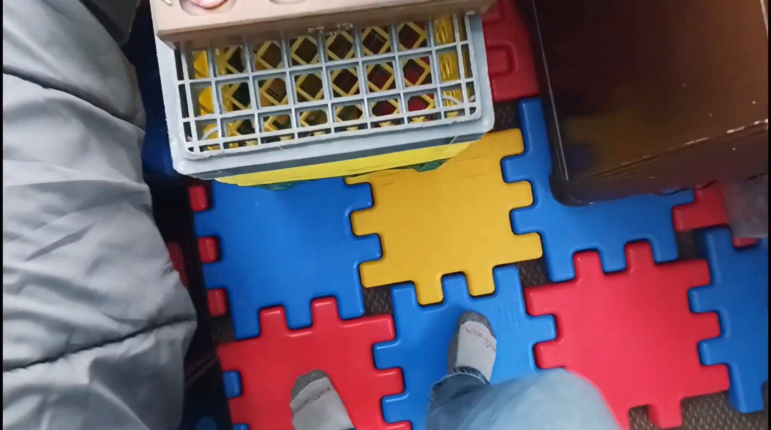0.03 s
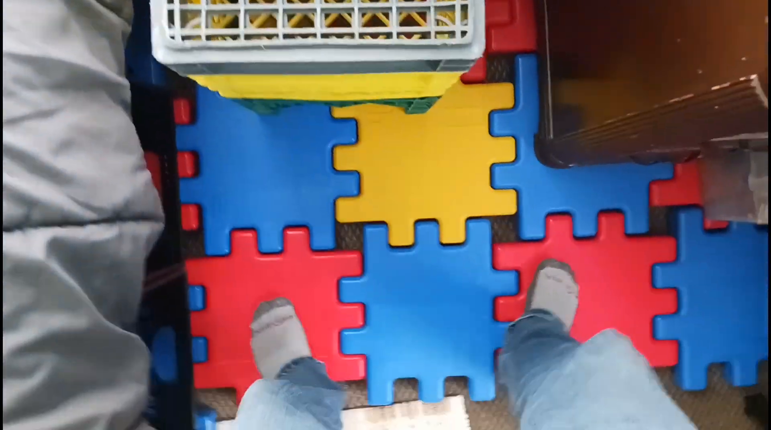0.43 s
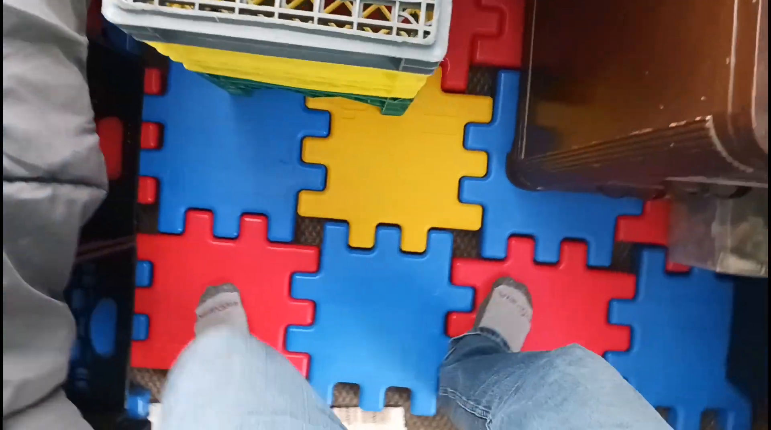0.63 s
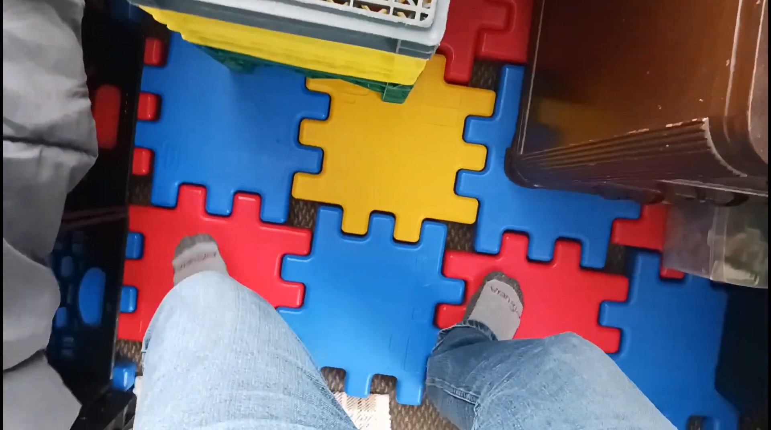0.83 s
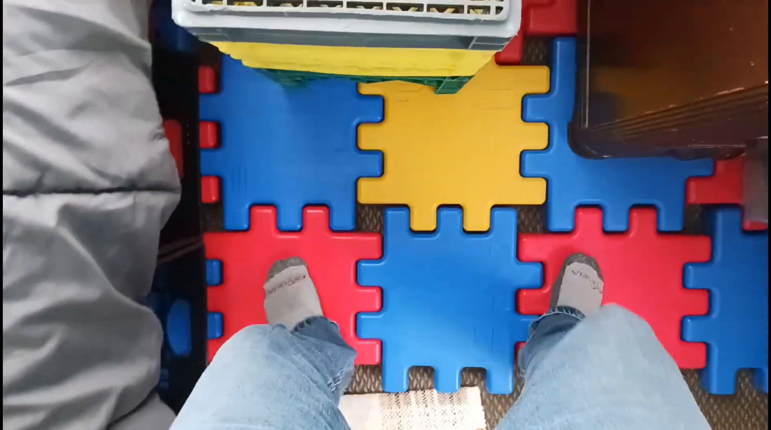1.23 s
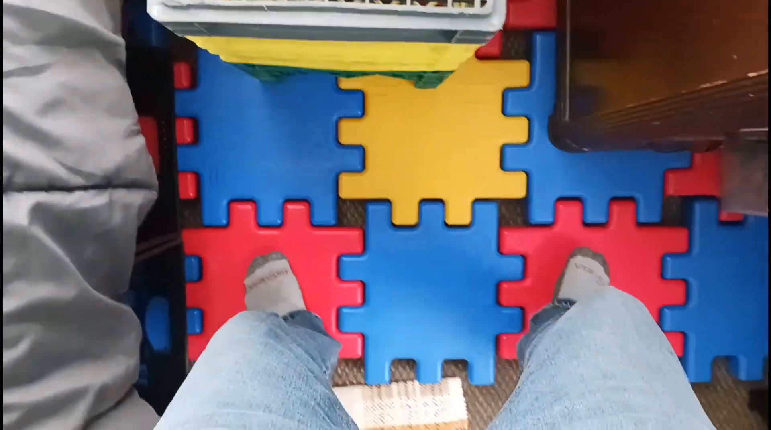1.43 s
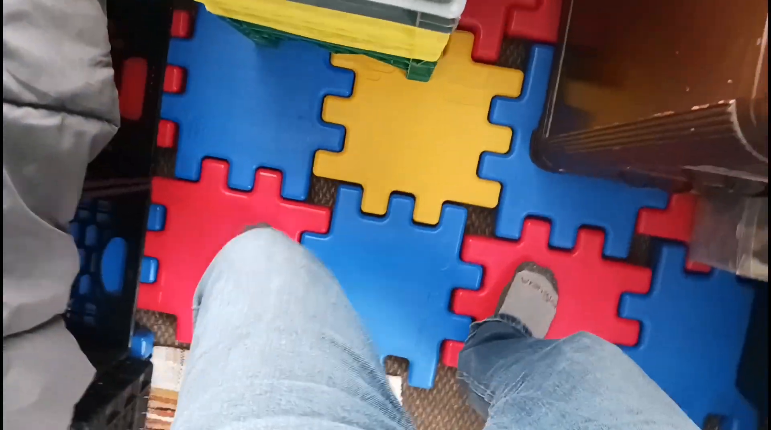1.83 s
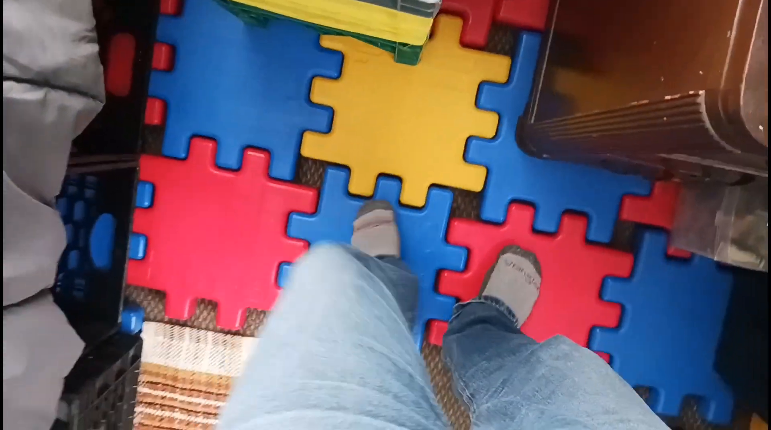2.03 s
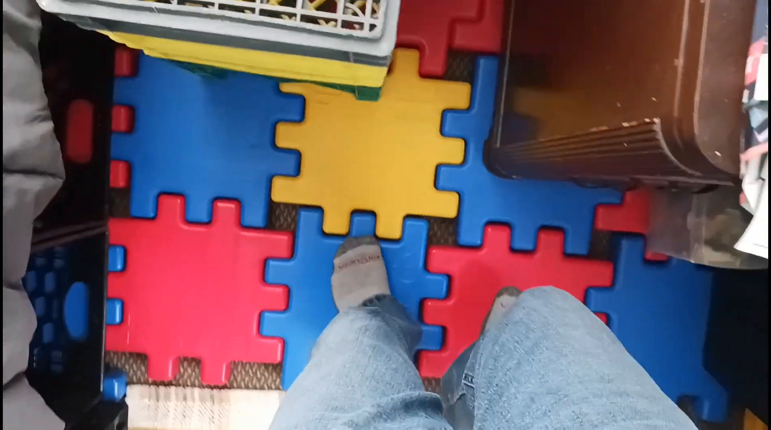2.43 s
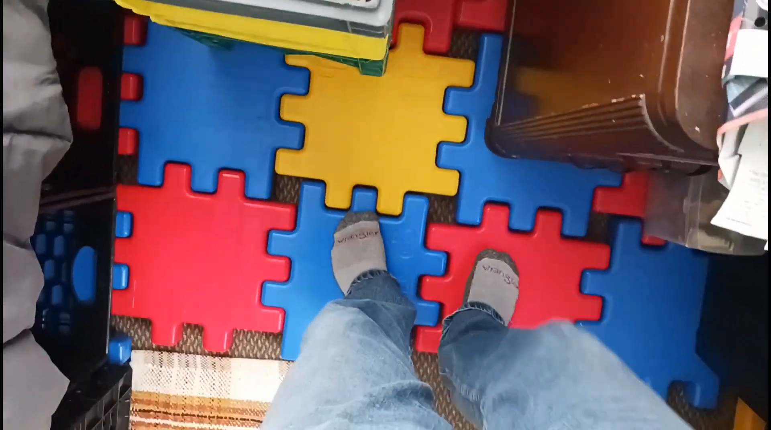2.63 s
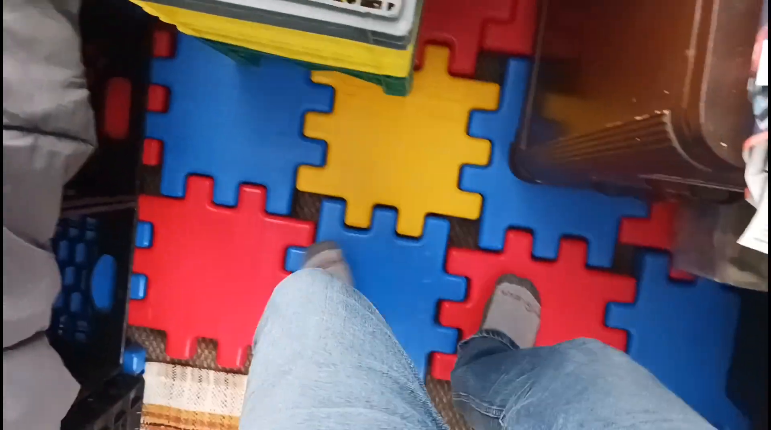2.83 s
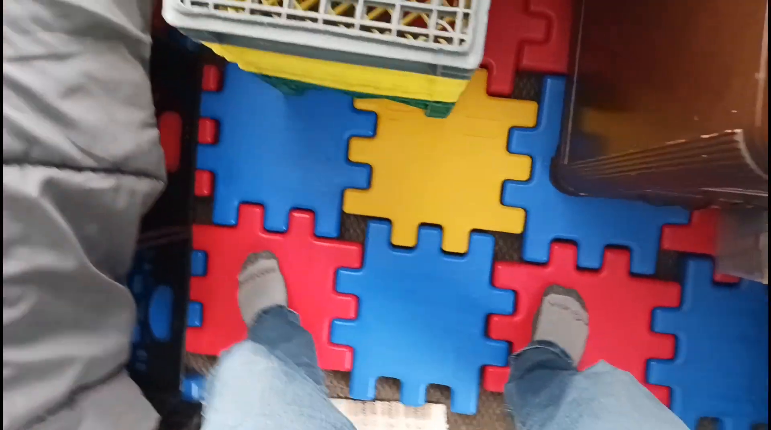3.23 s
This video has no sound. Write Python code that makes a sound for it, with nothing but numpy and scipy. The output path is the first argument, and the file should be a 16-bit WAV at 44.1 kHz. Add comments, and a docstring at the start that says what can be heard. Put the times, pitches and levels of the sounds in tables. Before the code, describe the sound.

Jeans swish and rub as someone in socks shuffles over foam floor tiles, heard from chest height in a small, quiet room. A soft step at 0.5 seconds leads into a big swish at 0.8, then the firmest landing thuds at 1.1. More dull steps come around 1.6, 2.1 and 2.7 seconds, alternating with big swishes near 1.9 and 2.9. A light step ends it at about 3.3.

```python
"""Someone in socks and jeans shuffles sideways over foam floor tiles in a small, quiet room.
A foot touches down with a soft knock, then the legs move: each swish is countless cloth fibres slipping.
The first big swish crests at 0.8 s; at 1.1 s comes the firmest landing, and the floor thuds under the
weight. More footfalls alternate with big swishes near 1.9 s and 2.9 s, and a light step ends the move.
All of it is heard from chest height."""
import sys
import numpy as np
from scipy import signal
from scipy.fft import rfft, irfft
from scipy.io import wavfile
from scipy.ndimage import uniform_filter1d

SR = 44100
rng = np.random.default_rng(int(sys.argv[2]) if len(sys.argv) > 2 else 0)


def store_wav(level_fs):
    """Save 16-bit WAV to argv[1]."""
    pcm = np.round(np.clip(np.atleast_2d(level_fs), -1, 1) * 32767)
    wavfile.write(sys.argv[1], SR, pcm.T.astype(np.int16))


N = 149940

# stereo image, 1 is mono: frequency_hz, correlation
STEREO_IMAGE = [(50, 0.61), (300, 0.74), (800, 0.88), (1200, 0.32), (1550, 0.57), (2100, -0.26),
                (2900, 0.34), (3400, -0.018), (4200, 0.3), (5200, -0.026)]
# room tone: frequency_hz, level_db
ROOM_TONE_EQ = [(20, -23), (45, 1), (90, -7.5), (160, -13), (600, -22), (1500, -31), (4500, -25),
                (15000, -21.5)]
# reverb decay: frequency_hz, t60_s
REVERB_DECAY = [(300, 0.22), (8000, 0.12)]
# weight sinking into the floor: start_s, peak_db, pitch_hz, swell_s
THUDS = [(0, -42, 45, 0.021), (0.492, -42, 155.5, 0.026), (0.549, -45.5, 82, 0.013),
         (1.095, -34, 95.3, 0.015), (1.099, -44, 52, 0.017), (1.495, -42.5, 63, 0.02),
         (1.563, -36.5, 67, .017), (1.615, -44.5, 48, .022), (2.15, -55, 53, 0.036),
         (2.191, -41.5, 98, 0.019), (2.69, -44, 43, 0.056), (2.705, -43, 187, 0.044),
         (3.272, -47.5, 93, 0.012)]
# feet landing: start_s, level_db, pitch_hz, settle_s, scuff_db
FOOTFALLS = [(.003, -55.5, 240, 0.059, -2), (0.493, -53, 167, 0.078, 5.5), (1.089, -38.5, 387, 0.027, -0.5),
             (1.624, -44.5, 308, 0.017, -7), (1.661, -54, 270, 0.023, -15), (2.141, -49, 184, 0.057, -0.5),
             (2.692, -41, 260, 0.042, -10.5), (2.993, -57.5, 246, 0.01, 2), (3.011, -67.5, 224, 0.011, 11),
             (3.263, -52, 162, 0.032, 3)]
# ring of the floor: pitch_hz, level_db, t60_s
FLOOR_MODES = [(148, 5, 0.3), (157, 9.5, 0.3), (184.9, 5.5, 0.317), (280, 1, 0.29), (311.6, -0.5, 0.23),
               (346.6, -11, 0.38), (384, -8, 0.21), (514, 3, 0.072), (801, 6.5, 0.047), (971, 13.5, 0.045)]
# sock on foam: frequency_hz, level_db
SCUFF_EQ = [(30, 1), (120, 6), (450, -2), (620, -9), (850, -4.5), (1200, -10), (2200, -14), (5000, -44),
            (15000, -55)]
# rubbing gathered in one band: peak_s, half_length_s, pitch_hz, width_hz, level_db
FRICTION_BANDS = [(0.262, 0.14, 2850, 690, -54), (0.77, 0.14, 13700, 2000, -36.5),
                  (1.202, 0.18, 3020, 403, -55.5), (1.224, 0.11, 1550, 410, -55.5),
                  (1.46, 0.16, 4360, 1020, -52), (1.832, 0.096, 82, 70, -53.5),
                  (1.865, 0.055, 13300, 2200, -40.5), (2.013, 0.12, 2350, 940, -47),
                  (2.802, 0.081, 970, 280, -53.5), (2.87, 0.13, 4760, 1000, -49.5),
                  (2.897, 0.071, 13200, 2780, -39), (3.041, 0.015, 5060, 1310, -39.5),
                  (3.135, 0.018, 910, 220, -54)]
# cloth tone at each ear: frequency_hz, level_db
CLOTH_EQ_LEFT = [(60, -16.5), (300, -15.5), (480, -13), (700, -10.5), (950, -4), (1150, -6), (1450, -1.5),
                 (2500, -4.5), (3500, -3), (4400, -1.5), (5100, 3), (6200, -1.5), (7300, -1), (8300, 2),
                 (9300, -3), (11000, -1), (12800, 0.5), (14200, 0.5), (15600, -0.5)]
CLOTH_EQ_RIGHT = [(60, -33), (300, -21.5), (600, -19), (800, -2.5), (980, -12), (1200, -11), (1500, -6.5),
                  (2100, -4), (3300, -11), (4400, -0.5), (5400, -0.5), (6500, 3), (8100, -10), (9400, -9),
                  (10800, -4.5), (12200, -8), (14200, -2), (15600, -69)]
# strokes of cloth on cloth and sock on foam: peak_s, rise_s, fall_s, body_db, rasp_db, hiss_db, fizz_db
STROKES = [(.195, .128, 0.19, -13.5, 1.5, -14, -2.5), (.35, 0.38, 0.089, -16.5, -1.5, -19, -4),
           (0.593, 0.041, 0.087, 3.5, -5, -0.5, -7), (0.811, 0.17, 0.18, 1.5, 2.5, 1.6, 6.5),
           (1.01, 0.13, 0.088, -2.5, 5.5, 1, 1), (1.257, 0.62, 0.14, -3, -16.5, -25, -29),
           (1.41, 0.16, 0.23, -18, -0.5, -10.5, -2), (1.87, 0.14, 0.19, 4, 3.5, 2, 3),
           (2.081, 0.14, 0.2, -5.5, 1, -8.5, -1.5), (2.33, 0.11, 0.16, -9.5, 0.5, -2.5, -1.5),
           (2.53, .11, 0.19, -14, 0.5, -8, -5), (2.865, 0.096, 0.19, -1.5, 2, 0, 4.5),
           (3.048, 0.076, 0.071, 2, 0, -1.5, -11), (3.113, 0.012, 0.18, -5.5, -0.5, -12.5, -14)]
STROKE_BANDS_HZ = (900, 2300, 5200, 11500)  # body, rasp, hiss, fizz

ROOM_TONE_DB, REVERB_DB, CLOTH_DB = -59, -9.5, -33.5
THUD_PAN_DB, FRICTION_PAN_DB = 1.5, 3  # thuds lean right, friction bands left
HEEL_DECAY_S, SOLE_GAIN = 0.0063, 0.8
ECHO_COUNT, ECHO_SPAN_S, ECHO_DRIFT_S_PER_S, ECHO_DB = 8, .012, 0.0002576, -10.5
SLIPS_PER_S, SLIP_SPREAD_DB, SLIP_SHARE = 9000, 1.5, 0.2
FOLD_DB, FLUTTER_DB = 1.5, 0.87
RISE_POWER, FALL_POWER = 3.2, 2.52  # a stroke starts more abruptly than it ends


def amp(db):
    """Decibels to gain."""
    return 10 ** (np.asarray(db) / 20)


def unit(x):
    """Scales to rms 1."""
    return x / np.sqrt(np.mean(x ** 2) + 1e-20)


def curve(points, hz):
    """Reads a curve on a log-frequency axis."""
    point_hz, value = np.transpose(points)
    return np.interp(np.log(hz + 1), np.log(point_hz + 1), value)


def add(mix, start_s, sound):
    """Mixes a sound in at its cue."""
    part = mix[..., max(0, round(start_s * SR)):][..., :sound.shape[-1]]
    part += sound[..., :part.shape[-1]]


def stereo(spectra, hz):
    """Blends two unrelated spectra into a pair, narrow in the bass and wide in the treble."""
    alike = curve(STEREO_IMAGE, hz)
    return np.array([spectra[0], alike * spectra[0] + np.sqrt(1 - alike ** 2) * spectra[1]])


def noise(eq, size):
    """Stereo noise through an EQ curve, rms 1."""
    hz = np.fft.rfftfreq(size, 1 / SR)
    white = stereo(rfft(rng.standard_normal((2, size))), hz)
    return unit(irfft(white * amp(curve(eq, hz)), size))


def wander(shape, size):
    """Smooth random modulation over (frames, bins), rms 1."""
    field = rng.standard_normal(shape)
    for axis in (-2, -1, -2, -1):
        field = uniform_filter1d(field, size[axis], axis)
    return unit(field)


def room_tone():
    """The steady, quiet air of the room."""
    return amp(ROOM_TONE_DB) * noise(ROOM_TONE_EQ, N)


def reverb(x):
    """The small room answers with a short diffuse tail whose treble dies first."""
    hz, t, white = signal.stft(rng.standard_normal((2, SR // 2)), SR, nperseg=256)
    envelope = amp(-60 * t / curve(REVERB_DECAY, hz)[:, None]) * np.minimum(t / .012, 1)
    tail = signal.istft(stereo(white, hz[:, None]) * envelope, nperseg=256)[1]
    return amp(REVERB_DB) * signal.fftconvolve(x, tail / np.linalg.norm(tail[0]), axes=1)[:, :N]


def floor_thud(peak_db, pitch_hz, swell_s):
    """The floor sinks under the weight and swings for a few cycles."""
    t = np.arange(SR // 2) / SR
    swell = (t / swell_s * np.exp(1 - t / swell_s)) ** 2
    return amp(peak_db + THUD_PAN_DB * np.array([[-1], [1]])) * swell * np.sin(2 * np.pi * pitch_hz * t)


def footfall(level_db, pitch_hz, settle_s, scuff_db):
    """The heel gives a damped knock, the settling sole rings the floor, and the sock scuffs."""
    t = np.arange(SR // 2) / SR
    settle = np.exp(-t / settle_s) * (1 - np.exp(-t / 0.001))
    ring = 0
    for mode_hz, mode_db, t60_s in FLOOR_MODES:
        emphasis = 0.42 + np.exp(-.5 * np.log2((mode_hz + 1) / pitch_hz) ** 2)  # bell at the heel's pitch
        ring += amp(mode_db - 60 * t / t60_s) * emphasis * np.sin(2 * np.pi * mode_hz * t)
    sole = signal.fftconvolve(rng.standard_normal(len(t)) * settle ** 2, ring)[:len(t)]
    heel = -np.sin(2 * np.pi * pitch_hz * t) * np.exp(-t / HEEL_DECAY_S) * (1 - np.exp(-t / 0.0015))
    knock = unit(unit(heel) + SOLE_GAIN * settle_s / .025 * unit(sole))
    scuff = amp(scuff_db) * unit(noise(SCUFF_EQ, len(t)) * settle)
    return amp(level_db) * 0.31 * (knock + scuff)


def friction_bands():
    """Rubbing gathers in narrow bands that swell and fade: low rumble, hollow scuffs, thin sizzles."""
    t, hz, out = np.arange(N) / SR, np.fft.rfftfreq(N, 1 / SR), 0
    for peak_s, half_length_s, pitch_hz, width_hz, level_db in FRICTION_BANDS:
        white = stereo(rfft(rng.standard_normal((2, N))), hz)
        band = irfft(white / (1 + abs(2 * (hz - pitch_hz) / width_hz) ** 2.1), N)
        swell = .5 ** (abs((t - peak_s) / half_length_s) ** FALL_POWER)
        out += amp(level_db) * swell * unit(band)
    return out * amp(FRICTION_PAN_DB * np.array([[1], [-1]]))


def reflections(x):
    """Echoes off floor, legs and furniture comb the sound; their paths drift as the body moves."""
    t, out = np.arange(N) / SR, x.copy()
    for ear, echoes in enumerate(rng.random((2, ECHO_COUNT, 2))):
        for k, (place, drift) in enumerate(echoes):
            delay_s = ECHO_SPAN_S * (k + place + .5) / ECHO_COUNT
            drift_s = ECHO_DRIFT_S_PER_S * (2 * drift - 1) * t
            out[ear] += amp(ECHO_DB) * (-1) ** k * np.interp(t - delay_s - drift_s, t, x[ear])
    return unit(out)


def fibre_slips():
    """Fibres slip in tiny, uneven clicks over a smooth hiss."""
    clicks = rng.standard_normal((2, N)) * amp(SLIP_SPREAD_DB * np.minimum(rng.exponential(1, (2, N)), 4))
    clicks *= rng.random((2, N)) < SLIPS_PER_S / SR
    return np.sqrt(SLIP_SHARE) * unit(clicks) + np.sqrt(1 - SLIP_SHARE) * rng.standard_normal((2, N))


def cloth_swishes():
    """Fibre slips, coloured by drifting folds and reflections, swell and fade with each stroke."""
    hz, t, grain = signal.stft(reflections(fibre_slips()), SR, nperseg=1024, noverlap=768)
    grain = stereo(grain.transpose(0, 2, 1), hz)  # ears, frames, bins
    power = 0
    for peak_s, rise_s, fall_s, *bands_db in STROKES:
        rise = abs((t - peak_s) / rise_s) ** RISE_POWER
        fall = abs((t - peak_s) / fall_s) ** FALL_POWER
        swell = .5 ** np.where(t < peak_s, rise, fall)
        colour = amp(curve(list(zip(STROKE_BANDS_HZ, bands_db)), hz))
        power += np.outer(swell, colour) ** 2
    eq_db = np.array([curve(CLOTH_EQ_LEFT, hz), curve(CLOTH_EQ_RIGHT, hz)])[:, None]
    folds_db = FOLD_DB * wander(grain.shape[1:], size=(14, 12))
    flutter_db = FLUTTER_DB * wander((len(t), 1), size=(6, 1))
    swishes = grain * np.sqrt(power) * amp(eq_db + folds_db + flutter_db)
    return amp(CLOTH_DB) * signal.istft(swishes.transpose(0, 2, 1), nperseg=1024, noverlap=768)[1][:, :N]


def scene():
    """Feet with their reverb, rubbing cloth and a bed of room tone."""
    feet = np.zeros((2, N))
    for start_s, *settings in FOOTFALLS:
        add(feet, start_s, footfall(*settings))
    for start_s, *settings in THUDS:
        add(feet, start_s, floor_thud(*settings))
    return feet + reverb(feet) + cloth_swishes() + friction_bands() + room_tone()


def record(dry):
    """Master EQ: a low cut at 34 Hz and a steep high cut at 15650 Hz."""
    low_cut = signal.butter(3, 34, "highpass", fs=SR, output="sos")
    high_cut = signal.firwin(511, 15650, window=("kaiser", 9), fs=SR)
    return signal.oaconvolve(signal.sosfilt(low_cut, dry), high_cut[None], "same")


dry = scene()
out = record(dry)
store_wav(out)
```